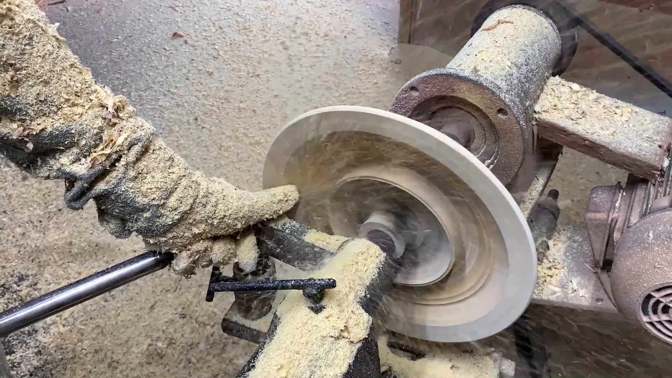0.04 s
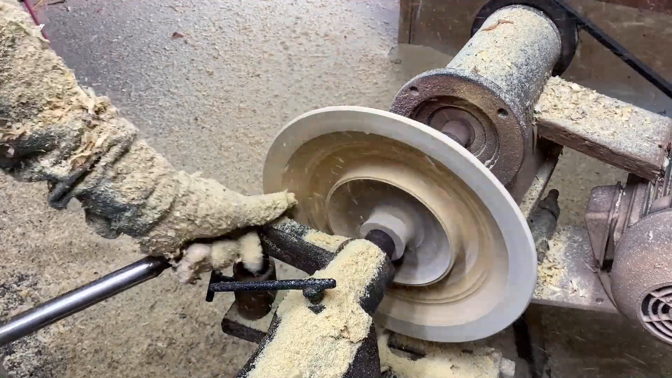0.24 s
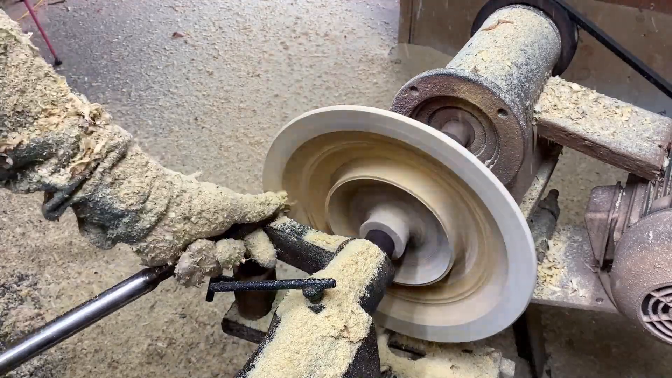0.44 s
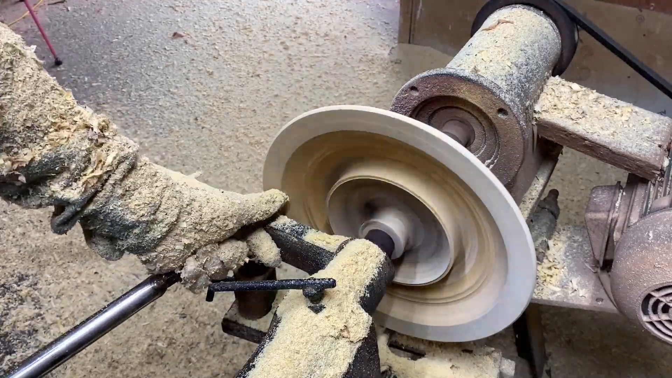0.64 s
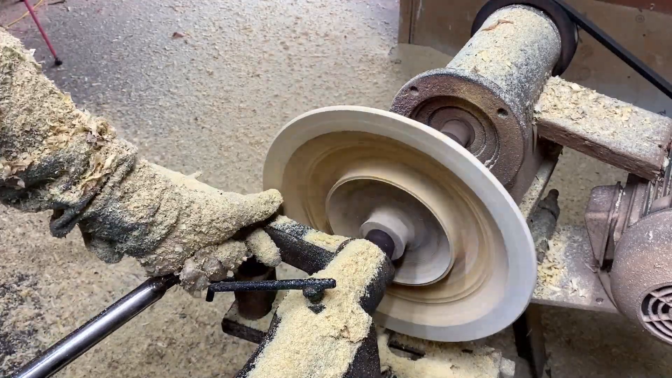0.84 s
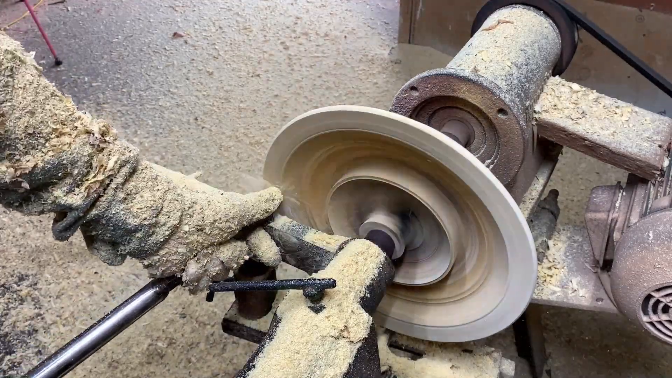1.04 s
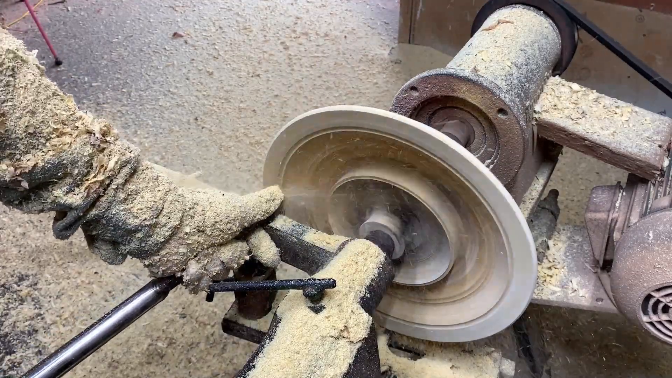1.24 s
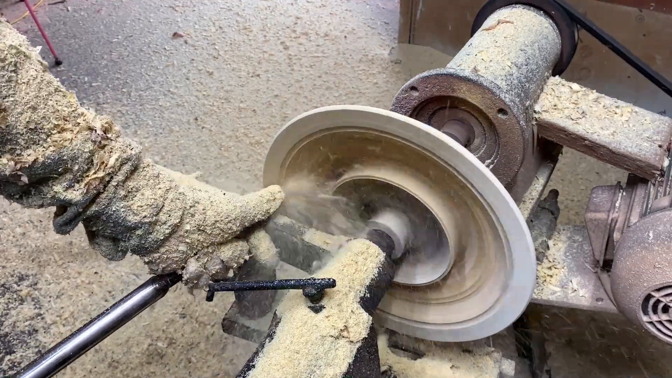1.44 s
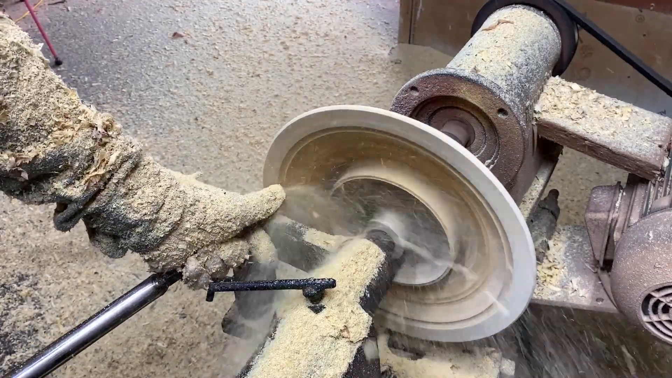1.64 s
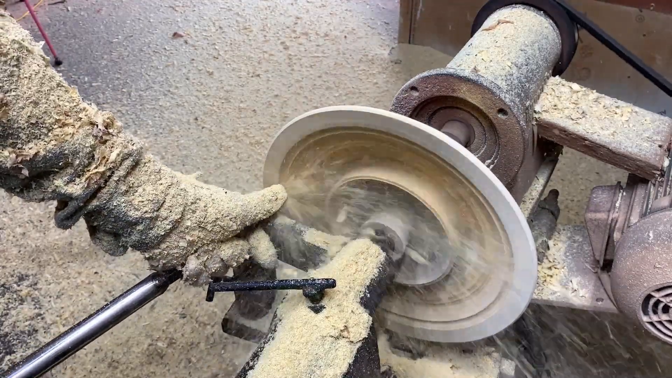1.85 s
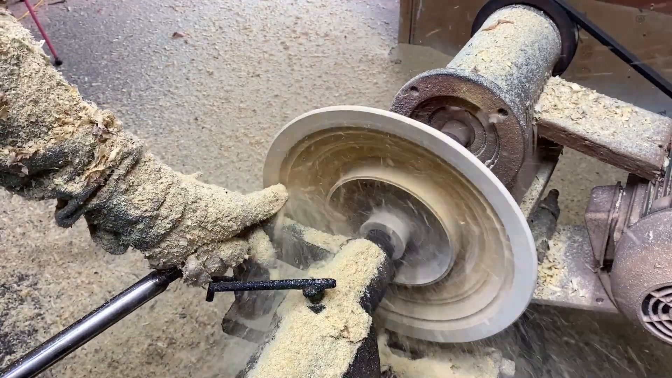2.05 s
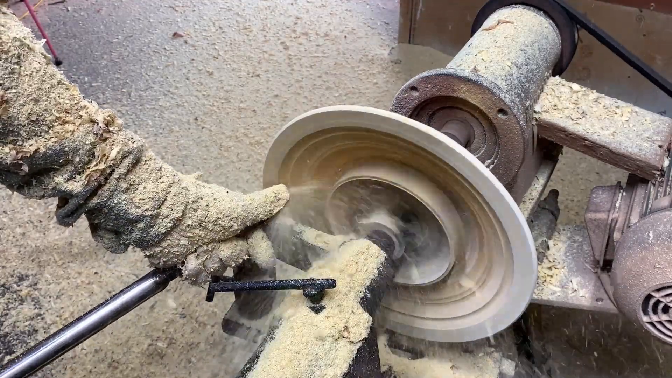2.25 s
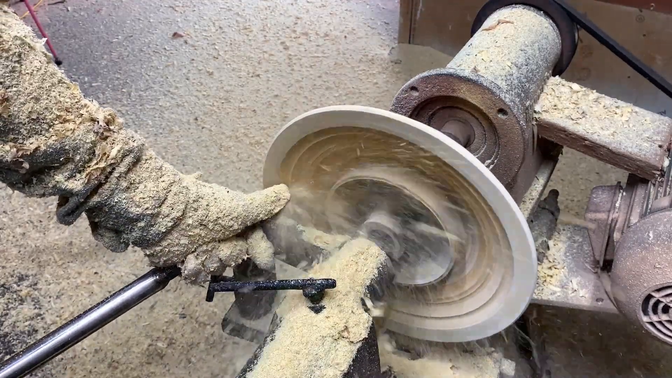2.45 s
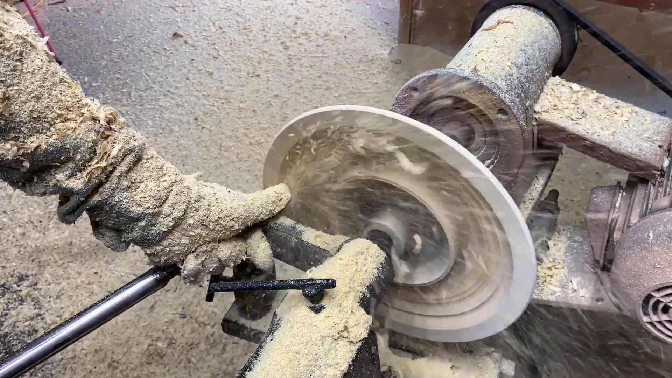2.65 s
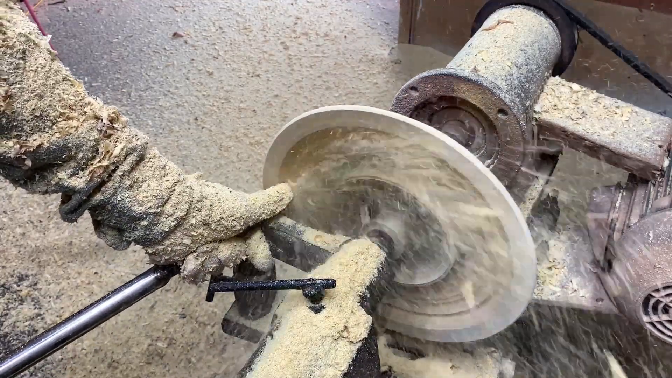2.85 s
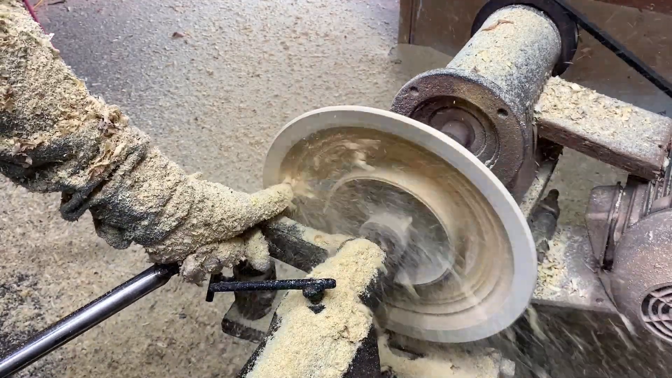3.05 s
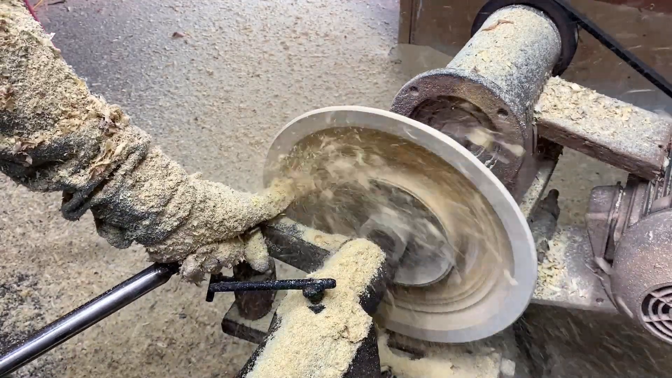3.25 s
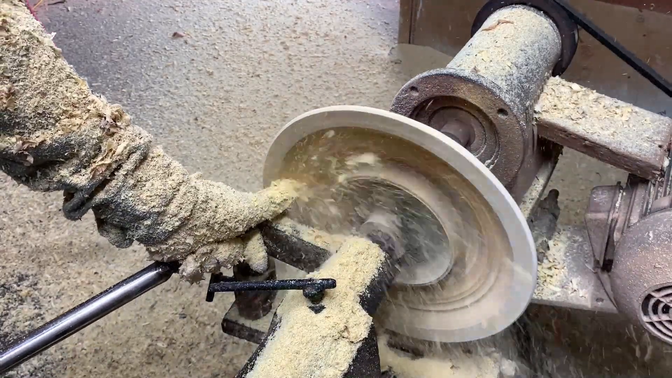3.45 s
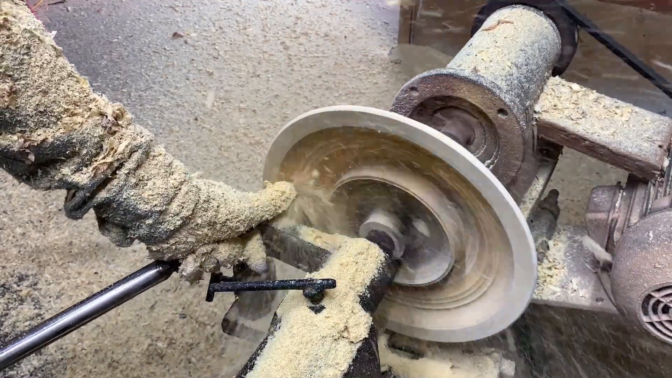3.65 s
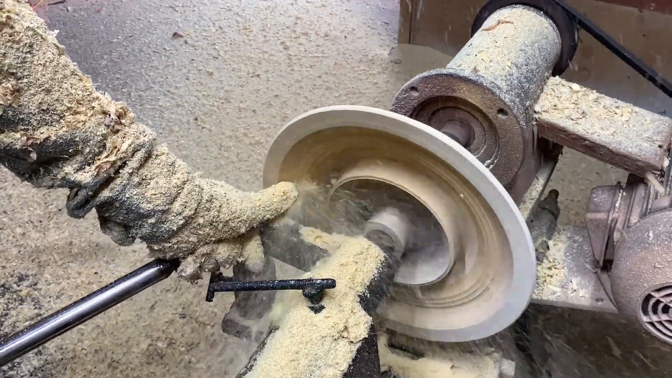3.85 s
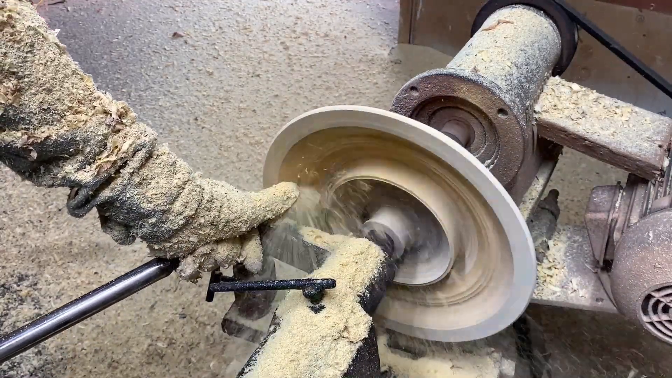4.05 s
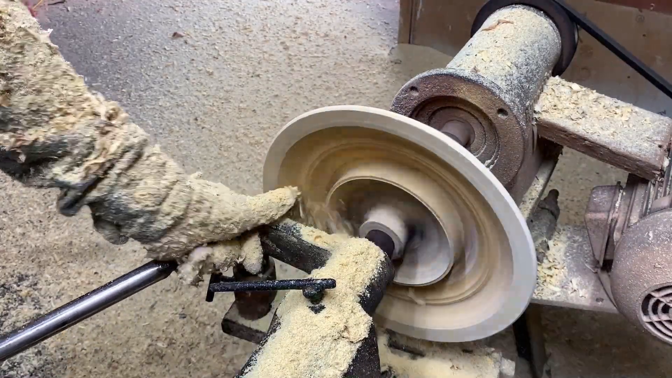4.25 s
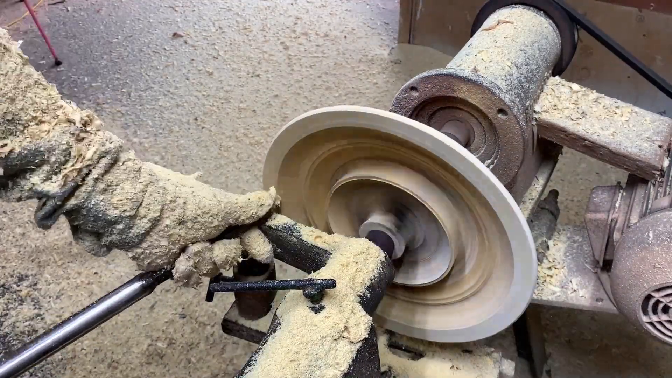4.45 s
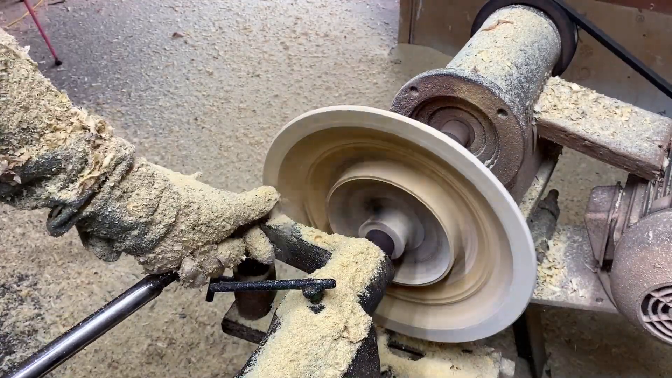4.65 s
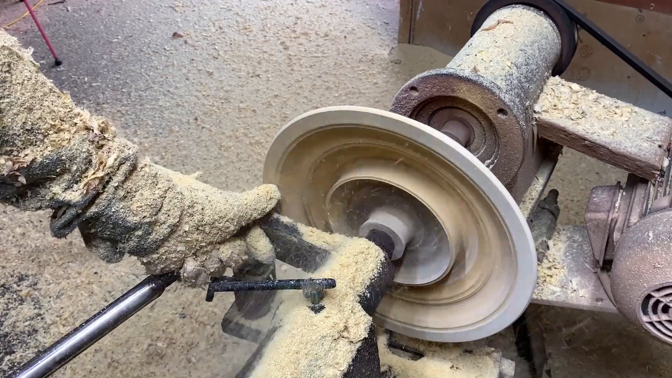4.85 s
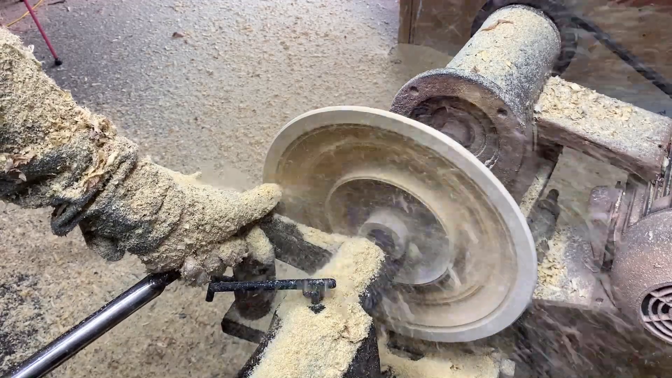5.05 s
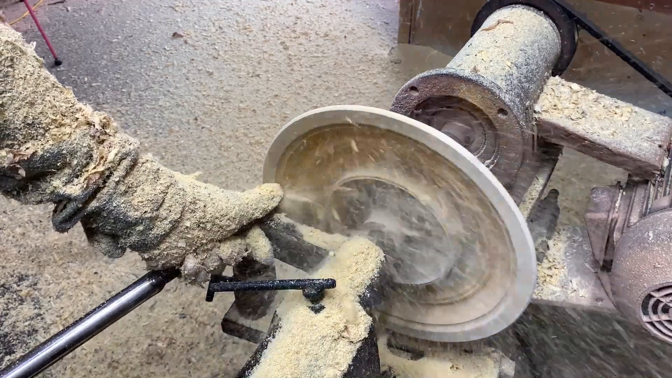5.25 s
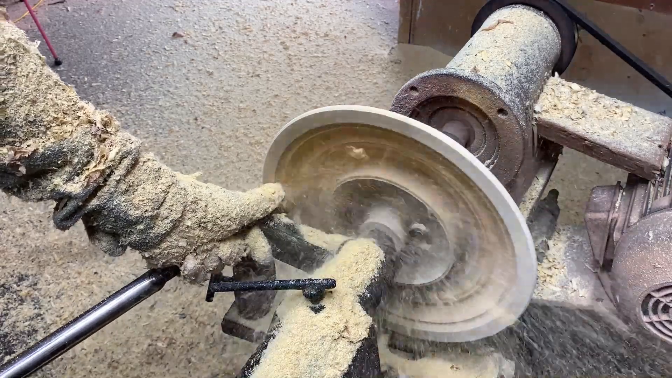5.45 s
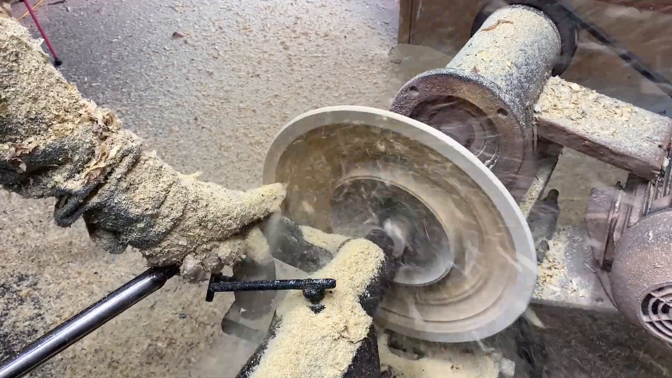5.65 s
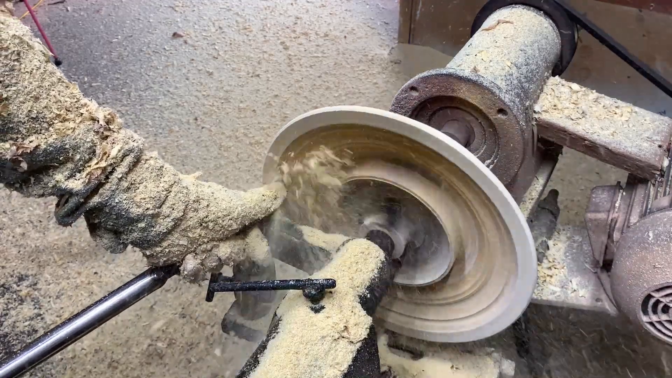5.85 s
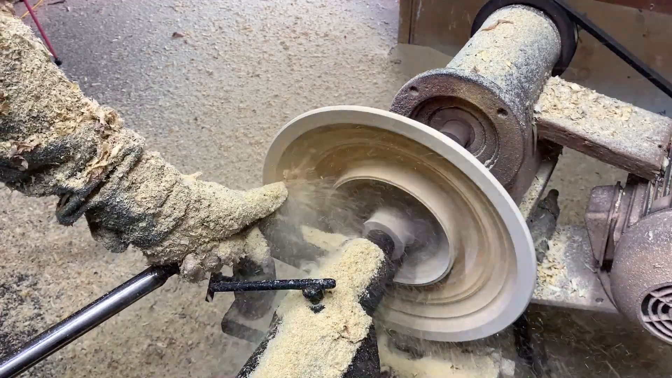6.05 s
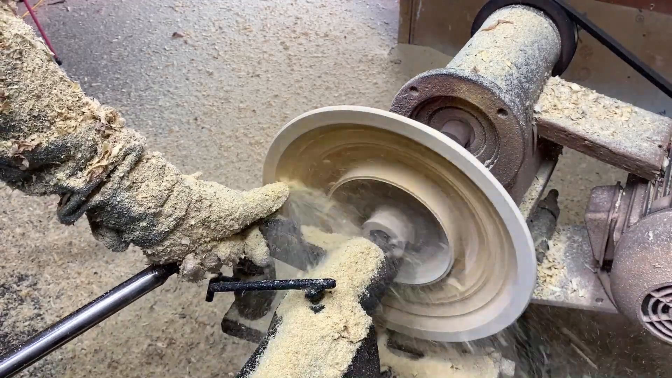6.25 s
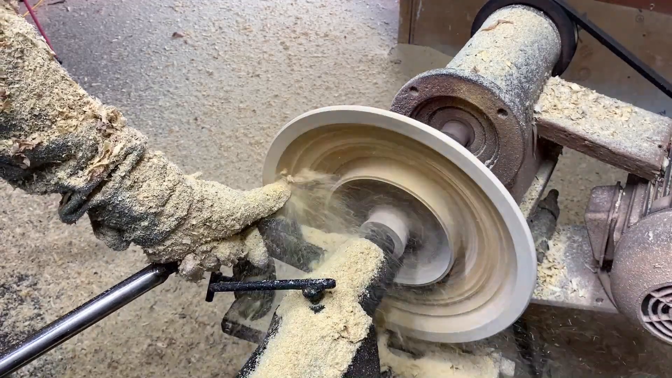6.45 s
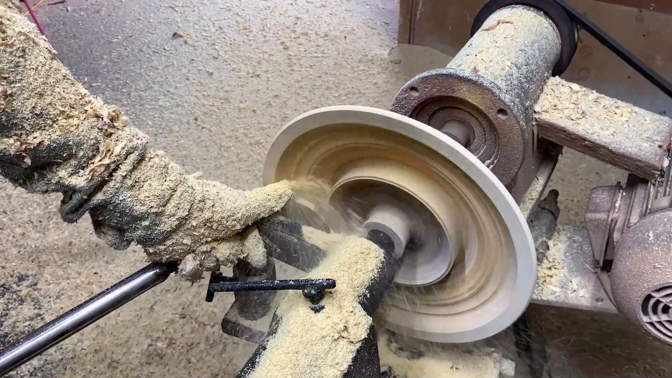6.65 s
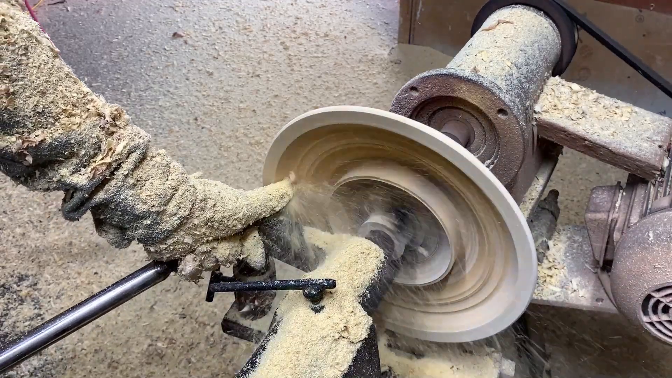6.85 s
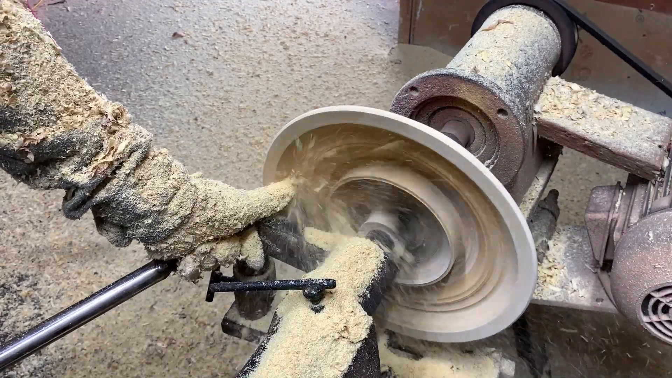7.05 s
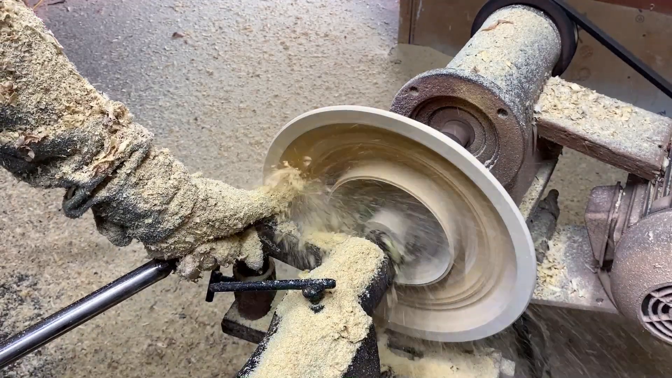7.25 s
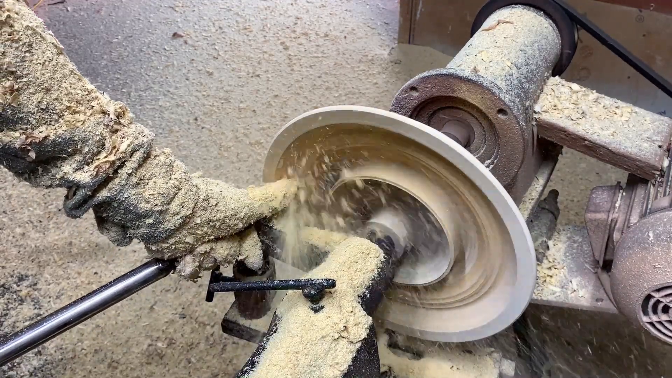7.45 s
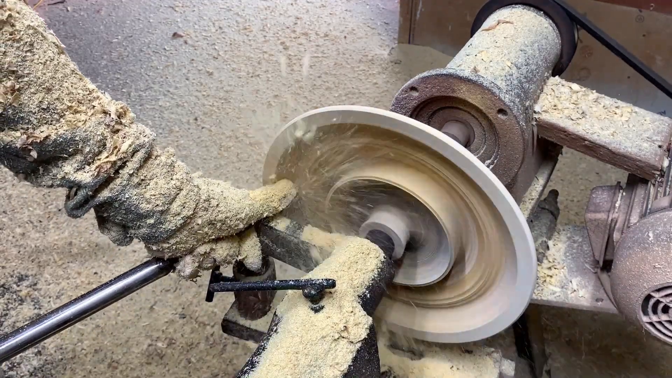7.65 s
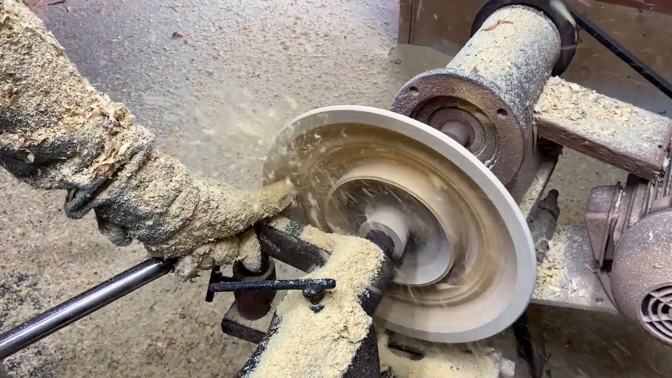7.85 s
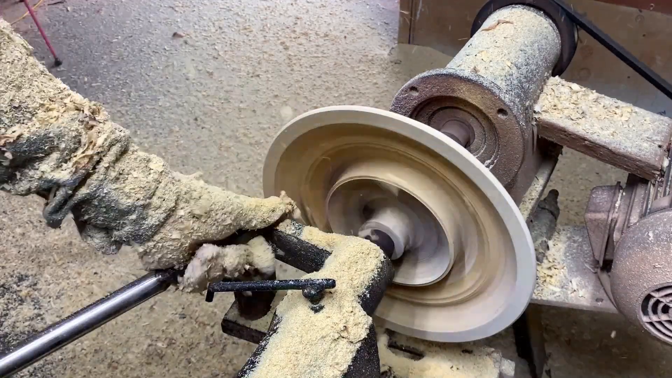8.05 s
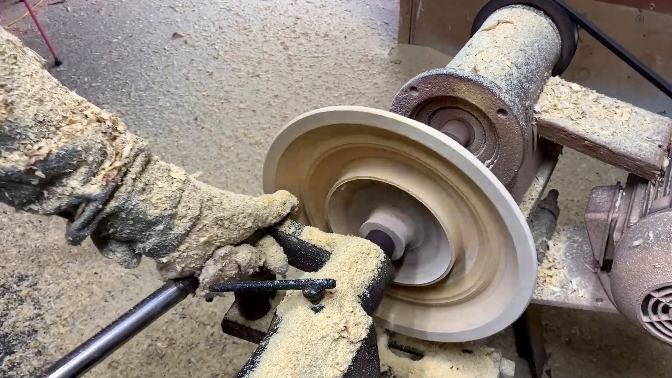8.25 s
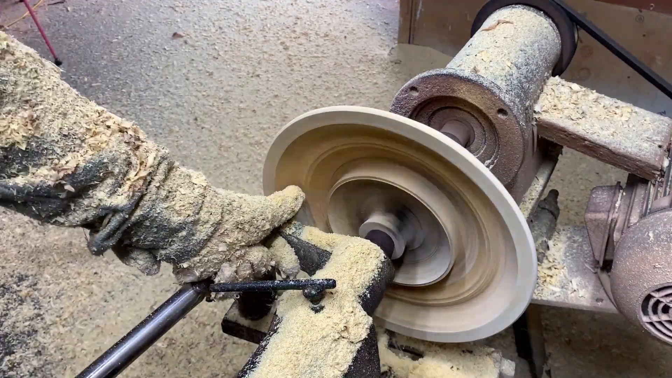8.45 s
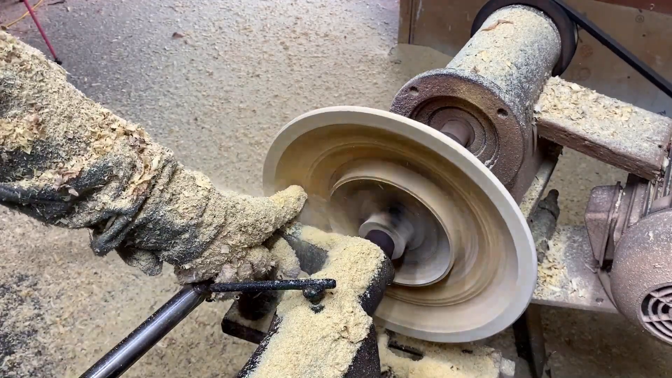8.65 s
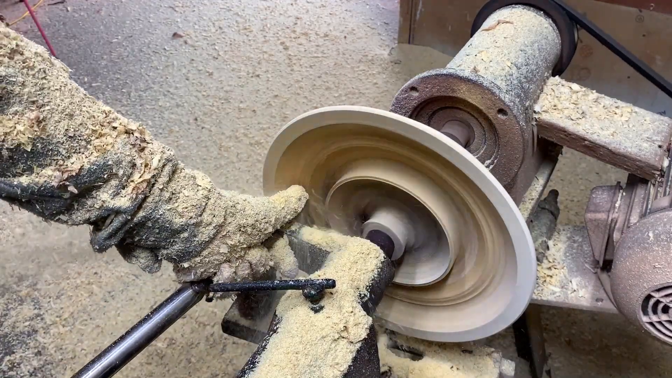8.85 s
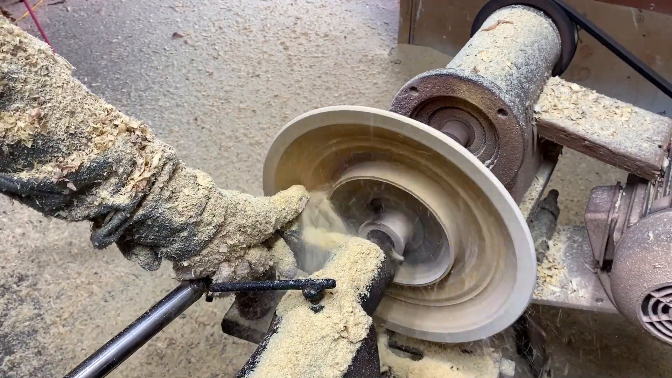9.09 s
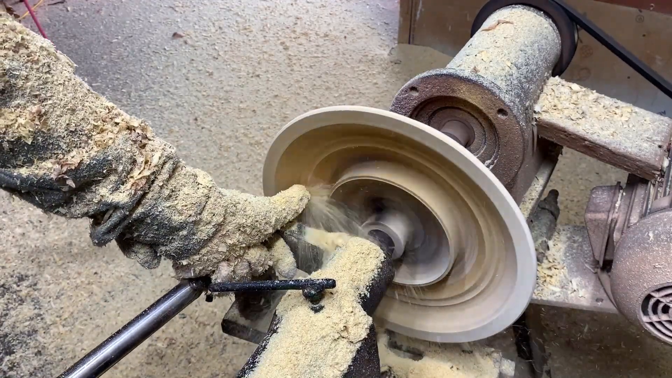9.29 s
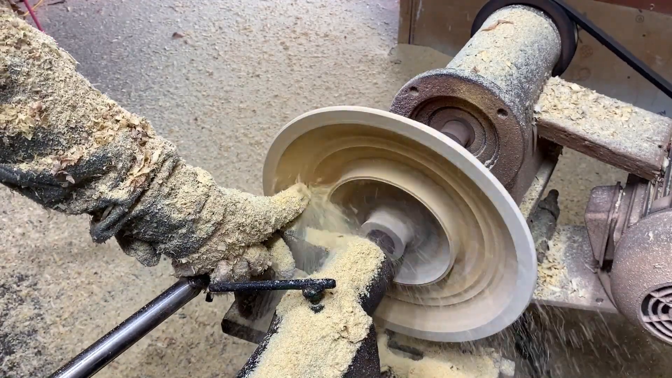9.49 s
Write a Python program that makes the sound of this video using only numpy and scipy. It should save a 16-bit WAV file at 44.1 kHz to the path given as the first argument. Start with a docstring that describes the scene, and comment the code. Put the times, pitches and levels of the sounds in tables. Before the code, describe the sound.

A wood lathe is already running close by, its motor droning with a throb over a belt whirr and a faint high whine. A gouge ends a cut on the spinning wooden plate at about 0.2 seconds and skims it lightly at 0.8. From 1 to 4.3 seconds it bites in a long, rough rasp, with hissing chips, slight ringing from plate and tool, and sharp little cracks, mostly around 2 to 2.4 seconds. After a brief lift, a second stroke runs from 4.6 to 7.9 seconds, crackling most between 5 and 6. Under each cut the motor sags and growls louder, then recovers in the gaps. At 8.4 seconds the edge returns, squeaks briefly and keeps cutting to the end, at about 9.5 seconds. Throughout, air stirred by the plate buffets the microphones in irregular low gusts, and the chip hiss is brighter on the right.

```python
"""A wood lathe is already running, its motor droning in throbbing bands, as a gouge ends a cut on a plate.
The edge lifts, skims the wood once, then bites for two long strokes, from about 1 s and 4.6 s.
Each stroke rasps, rings in plate and tool and sprays chips; the motor sags and growls, then recovers.
At 8.4 s the edge returns, squeaks and cuts on to the end. All along, air stirred by the spinning
plate buffets two unlike microphones, the right one brighter."""
import sys
import numpy as np
from scipy import signal
from scipy.fft import rfft, irfft, next_fast_len
from scipy.io import wavfile
from scipy.ndimage import uniform_filter1d

SR = 44100
rng = np.random.default_rng(int(sys.argv[2]) if len(sys.argv) > 2 else 0)


def generate_wav(sig):
    """Save sig (samples, or channels by samples) to the path in sys.argv[1] as 16-bit PCM at SR."""
    pcm = np.round(np.clip(np.atleast_2d(sig).T, -1, 1) * 32767).astype(np.int16)
    wavfile.write(sys.argv[1], SR, pcm)


N = 419832

# gouge strokes: start/s, end/s, attack/s, release/s, then start and end pairs of: place on the plate/0-1,
# and at full bite rasp/dB, edge/dB, spray/dB, dust against spray/dB
STROKES = [(-.4, 0.22, .05, 0.23, 0.76, 0.85, -28, -30, -37, -40.5, -45, -43, -4, -5.5),
           (.735, 0.84, 0.35, .06, .92, 0.96, -35, -35, -37, -39, -48, -47, -5, -14),
           (1.021, 4.28, 0.038, 0.29, 0.01, .95, -29.5, -30.5, -31, -42, -49, -51.5, -1.5, 1.5),
           (4.645, 7.915, 0.056, 0.21, 0.02, 0.96, -29, -31.5, -31.5, -44, -42.5, -52.5, -5, 0.5),
           (8.402, 9.69, 0.21, .1, 0.6, .98, -30, -29, -38.5, -41, -44, -52, -0.5, -1)]
# accents where the gouge digs in or skips: t/s, half-width/s, cut/dB, low drone/dB, upper drone/dB
DIGS = [(0.097, 0.042, 0, 2.5, 5), (1.193, 0.078, 0.5, 4.5, 3.5), (1.376, 0.037, 6, 8.5, 1),
        (2.022, 0.019, 3.5, 5.5, -1), (3.552, 0.021, 3, 5.5, 3), (4.84, 0.094, 4, 6.5, 2),
        (1.6, 0.15, 2, 0.5, -1.5), (2.705, 0.17, 1.5, 1, 1.5), (5.207, .02, 0, 7, 0),
        (5.23, 0.11, 1.5, 0, -1.5), (5.34, .015, 0, 5, 0), (5.721, .04, 6, 7, -4.5),
        (5.988, 0.044, 1.5, 4, 3), (6.37, .05, 1, 4, 2.5), (7.86, 0.028, 5, -4, 1),
        (8.434, 0.012, -10, 1, 5), (8.667, .012, 5, 0.5, 0.5), (8.856, 0.13, 3, 9, 1), (9.2, .2, 0.5, 2, 2),
        (9.298, .012, 5, 0, 2), (9.425, 0.055, 6, 6, 4)]
# the hardest spots catching the edge: t/s, level/dB
CATCHES = [(.792, -43), (1.0889, -31), (1.1516, -20.5), (1.4671, -27), (2.0114, -32), (2.1405, -20.5),
           (2.265, -17.5), (2.3307, -23), (2.391, -29), (3.0973, -32), (3.2205, -30), (4.714, -26),
           (5.0474, -23), (5.175, -20.5), (5.3486, -19.5), (5.4025, -21), (5.516, -18), (5.6391, -24),
           (5.7059, -25), (5.769, -23), (5.9604, -29), (8.4123, -36), (8.9615, -27)]
# plate rings: f/Hz at place 0, glide/Hz across the plate, width/Hz, top level/dB against the rasp,
# loudest place/0-1, travel from there to lose 10 dB/share of the plate
PLATE_MODES = [(1806, -20, 65, -8, 0.4, 2), (2318, -39.5, 110, -9.5, 0.2, 2),
               (3620, -600, 140, -8.5, 0.8, 0.45), (3480, -60, 42, -11.5, 0.44, 0.35)]
# gouge rings: the same columns, level/dB against the edge hiss
TOOL_MODES = [(4760, -130, 80, -4.5, .36, 0.42), (4760, -50, 100, -9.5, .85, .4),
              (5260, -150, 85, -7, 0.11, 0.14), (5700, -100, 87, -8, .02, .06),
              (5990, -100, 75, -13, .3, 0.5), (6520, -300, 130, -11, .08, .3),
              (6390, -30, 130, -10, .6, .6), (5500, -2300, 260, -11, 0.4, 0.4),
              (4300, 60, 140, -11, 0.45, .3)]
# EQ curves of the cut: f/Hz, relative level/dB
RASP_EQ = [(250, 6), (400, -11), (850, -1.5), (1100, 6), (1500, -1), (2500, -0.5), (3300, -3.5),
           (4200, -19), (5500, -47)]  # tearing fibres
EDGE_EQ = [(2800, -31), (3800, 1.5), (4800, 1), (6000, -4.5), (7000, -6), (8000, -16.5), (9500, -22)]  # hiss at the steel edge
SPRAY_EQ = [(5500, -27), (7200, 1), (8200, 6.5), (9200, -3.5), (10500, -13), (12000, -26)]  # flying chips
DUST_EQ = [(9000, -6), (10800, -2.5), (12000, -5), (14000, -5), (14900, -11), (15300, -20), (16000, -32)]  # fine dust
CRACK_EQ = [(1000, -8), (1800, 3), (2500, 1.5), (4700, -0.5), (6400, -5), (7400, -12), (8600, -6.5),
            (11000, -20), (15500, -28)]  # hard spots
# motor speed: t/s, turn rate/Hz
MOTOR_SPEED = [(0.0, 26.33), (0.2, 26.44), (0.45, 26.9), (0.9, 27.03), (1.1, 26.55), (1.35, 25.74),
               (2.0, 25.44), (2.7, 25.63), (3.5, 25.5), (4.15, 25.94), (4.4, 26.89), (4.62, 26.83),
               (4.85, 25.87), (5.5, 25.33), (6.2, 25.37), (7.0, 25.42), (7.8, 25.8), (8.05, 26.81),
               (8.4, 26.9), (8.75, 25.88), (9.1, 25.3), (9.52, 25.21)]
# drone bands: multiple of motor speed, width/Hz, free trim/dB, loaded trim/dB, throb depth/0-1,
# pan/dB left over right
LOW_BANDS = [(22.82, 23.4, -3.5, -9.5, 0.44, -11.5), (21.49, 20.6, -10, -3.5, 0.23, -9),
             (23.87, 76, -8, -5.5, 0.08, -6), (20.24, 68, -10.5, -10, 0, -2.5)]
UPPER_BANDS = [(47.47, 40, -0.5, 0.5, 0.56, -3.5), (44.2, 47, -9, -17, 0.31, -5.5),
               (68, 49, -18, -22, 0.97, -4.5)]
# inverter and motor whine: f/Hz, level/dB before WHINE_GAIN_DB
WHINE_LINES = [(5281, -75), (5529, -75.5), (6062, -72.5), (6783, -73.5), (11418, -94), (12016, -79.5),
               (12608, -78.5)]
# belt and fan whirr: f/Hz, relative level/dB
WHIRR_EQ = [(150, 9), (300, -7), (450, -7), (800, -3.5), (1500, -6), (2500, -10), (4500, -23.5),
            (6000, -20), (8000, -34.5), (10500, -52)]
# gusts on the microphones: t/s, peak level/dB, time to fall 20 dB/s
GUSTS = [(.12, -27, .12), (.727, -33, .08), (.83, -29, .12), (.88, -30, .06), (.957, -24, .1),
         (1.121, -21, .05), (1.178, -17.5, .1), (1.327, -28, .08), (1.72, -32, .1), (1.835, -24.5, .09),
         (1.948, -28, .08), (2.071, -25, .05), (2.182, -28, .08), (2.27, -24, .06), (2.351, -18.5, .14),
         (2.431, -21, .06), (2.509, -26, .05), (2.8, -26, .1), (3.083, -31, .1), (3.183, -31, .08),
         (3.27, -26, .15), (3.346, -16, .14), (3.94, -33, .1), (4.305, -19.5, .12), (4.382, -20, .07),
         (4.851, -17.5, .1), (4.939, -20, .08), (5.05, -22, .14), (5.13, -27, .08), (5.398, -20, .1),
         (5.565, -20, .1), (5.63, -25, .05), (5.685, -25, .06), (5.906, -26, .1), (6.105, -28, .12),
         (6.21, -31, .05), (6.325, -21, .1), (6.883, -33, .1), (7.158, -27, .08), (7.565, -19.5, .1),
         (7.685, -26, .06), (8.195, -20, .08), (8.23, -20, .06), (8.296, -18, .12), (8.385, -19, .07),
         (8.461, -30, .06), (8.6, -31, .1), (8.73, -19, .1), (8.874, -27, .05), (8.918, -27, .07),
         (9.01, -24, .12), (9.31, -30, .08), (9.5, -30, .3)]
# body and top of the gusts: f/Hz, relative level/dB
RUMBLE_EQ = [(15, 3.0), (30, -11.5), (70, 1), (120, -0.5), (200, -5.0), (350, -14.5), (600, -23.5)]
FLUTTER_EQ = [(100, -20), (200, 0.5), (350, -9), (600, -16), (900, -35)]
# cavity of the right microphone port: f/Hz, level/dB against the left
RIGHT_PORT_EQ = [(6000, 0), (7880, 2), (8060, 15), (9130, 14.5), (9400, 10), (10000, 7), (10600, 1.5),
                 (13000, 0)]

SPINDLE_HZ, SPINDLE_START_TURN = 15.7, 0.14
FIRST_BITE, SHORTEST_BITE_S = 0.4, .2  # share of the bite taken at once; a shorter stroke only skims
SLOW_ENDS = .6  # 0 = even travel, 1 = slow at both ends of a stroke
TOUCH_DB, EASED_DB = (-13, -13, -9.5), (-11, -8.5, -9)  # rasp, edge, spray against full bite
RING_WANDER, RING_BURST_DB, RING_FADE_DB, RING_TURN_DB = .005, 2.5, 1.2, 1.25
TICK_TURN, TICK_DB, TICK_SPREAD_DB = .7, -38, 3.5
FREE_HZ, LOADED_HZ, MOTOR_START_TURN = 26.9, 25.5, .44
DRONE_FREE_DB, DRONE_BITING_DB, DRONE_TRAVEL_DB = (-31.5, -36.5), (-26.5, -26), (-2, -2)  # low, upper
DRONE_LAG_S, EASED_EFFORT_LOSS = 0.037, 0.48
PLATE_THROB_DB, PLATE_THROB_TURN = 2.4, .06
WHINE_GAIN_DB, CARRIER_HZ, CARRIER_DB = 7.5, 12016, -75
WHIRR_DB, BREEZE_DB = -40.5, -41.5
GUST_RISE_SHARE = 0.67  # attack as a share of the fall time
CUTOFF_HZ = 15760


def cut():
    """Fibres tear as dense noise; pressure wavers, and the grain passes with each turn of the plate."""
    rasp_db, edge_db, spray_db, dust_db = cut_levels()
    angle = plate_angle()
    grain_db = 0.72 * np.cos(angle)
    pressure_db = 0.55 * drift(6.6) + 0.32 * np.cos(4 * angle + 1.5) + 0.37 * np.cos(3 * angle + 0.66)
    tearing, clumps = drift(156), drift(31)  # chips break off in bursts
    noise = rng.standard_normal((4, 2, N))
    ring_drive = from_db(0.43 * tearing + 0.73 * clumps)
    rasp = colour(noise[0] * from_db(1.7 * tearing + 2.0 * clumps), RASP_EQ)
    rasp += ring_drive * rings(PLATE_MODES, angle)
    edge = colour(noise[1] * from_db(1.26 * tearing + 0.21 * clumps + 0.41 * drift(9.8)), EDGE_EQ)
    edge += ring_drive * rings(TOOL_MODES, angle)
    spray = colour(noise[2] * from_db(0.87 * tearing + 0.41 * drift(30)), SPRAY_EQ)
    dust = colour(noise[3] * from_db(0.46 * tearing + 0.9 * drift(28) + .8 * drift(4)), DUST_EQ)
    mix = from_db(rasp_db + grain_db) * rasp + from_db(edge_db + .4 * grain_db) * edge
    mix += from_db(spray_db) * (spray + from_db(dust_db) * dust)
    return contact() * from_db(pressure_db) * fibre_texture(mix, depth_db=1.5)


def strokes():
    """The hand's moves: bite, easing off and place on the plate (all 0-1), and four full-bite levels."""
    t = np.arange(N) / SR
    table = np.array(STROKES)
    handovers = (table[1:, 0] + table[:-1, 1]) / 2
    start, end, attack_s, release_s, *pairs = table[np.searchsorted(handovers, t)].T
    since = t - start - 1 / SPINDLE_HZ  # the edge skims for one turn first
    biting = (since > 0) * (end - start > SHORTEST_BITE_S)
    bite = biting * (1 - (1 - FIRST_BITE) * np.exp(-np.maximum(since, 0) / attack_s))
    easing = np.clip(1 - (end - t) / release_s, 0, 1) ** 2
    done = np.clip((t - start) / (end - start), 0, 1)
    done -= SLOW_ENDS * np.sin(2 * np.pi * done) / (2 * np.pi)
    place, *levels_db = (first + (last - first) * done for first, last in zip(pairs[::2], pairs[1::2]))
    return bite, easing, np.clip(place, 0, 1), np.array(levels_db)


def contact(fade_s=0.02):
    """Gate: 1 while the gouge is on the wood, 0 when lifted."""
    t = np.arange(N) / SR
    return sum(np.clip(np.minimum(t - start, end - t) / fade_s + .5, 0, 1) for start, end, *_ in STROKES)


def digs():
    """Digs and skips briefly push or duck the cut, the low drone and the upper drone, in dB."""
    return control_rate(lambda t: sum(
        np.outer(push_db, np.exp(-((t - at) / width_s) ** 2)) for at, width_s, *push_db in DIGS))


def cut_levels():
    """Rasp, edge and spray in dB swell with the bite and sink on easing off; dust rides on the spray."""
    bite, easing, _, full_db = strokes()
    levels_db = full_db[:-1] + np.outer(TOUCH_DB, 1 - bite) + np.outer(EASED_DB, easing) + digs()[0]
    return *levels_db, full_db[-1]


def plate_angle():
    """Angle of the spinning plate in radians."""
    return 2 * np.pi * (SPINDLE_HZ * np.arange(N) / SR + SPINDLE_START_TURN)


def rings(modes, angle):
    """Gliding resonances, each speaking up as the gouge passes its sweet spot on the plate."""
    place = strokes()[2]
    out = 0
    for start_hz, glide_hz, width_hz, top_db, sweet_spot, reach in modes:
        hz = (start_hz + glide_hz * place) * (1 + RING_WANDER * drift(2.5)[0])
        level_db = top_db - 10 * ((place - sweet_spot) / reach) ** 2
        motion_db = RING_BURST_DB * drift(12.7) + RING_FADE_DB * drift(1.1) + RING_TURN_DB * np.cos(angle)
        out += from_db(level_db + motion_db) * narrow_noise(np.cumsum(hz) / SR, width_hz)
    return out


def fibre_texture(x, depth_db):
    """Half-octave slices, 1 to 8 kHz, swell and sink on their own as fibres of different sizes tear."""
    size = next_fast_len(N)
    spectrum = rfft(x, size)
    khz = np.arange(1, size // 2 + 2) * SR / size / 1000
    half_octaves = np.clip(2 * np.log2(khz), 0, 6)
    slices = (irfft(spectrum * np.clip(1 - abs(half_octaves - k), 0, 1), size)[:, :N] for k in range(7))
    return sum(part * from_db(depth_db * drift(29.0)) for part in slices)


def catches(t60_s):
    """Hard spots crack against the edge, over a fainter tick once a turn while the gouge bites."""
    crack = colour(rng.standard_normal((2, N)), CRACK_EQ)
    turns = np.arange(1, int(SPINDLE_HZ * N / SR)) + TICK_TURN - SPINDLE_START_TURN
    ticks = (turns / SPINDLE_HZ * SR).astype(int)
    tick_db = TICK_DB + TICK_SPREAD_DB * rng.standard_normal(N)[:len(ticks)]
    bite = strokes()[0] * contact()
    hits = np.zeros(N)
    hits[ticks] = from_db(tick_db) * bite[ticks]
    for at, level_db in CATCHES:
        hits[round(at * SR)] = from_db(level_db)
    decay = from_db(-60 / (t60_s * SR))
    return signal.lfilter([1], [1, -decay], hits + 1e-18) * crack


def squeak(at_s, half_width_s, hz, level_db):
    """The edge meets the wood again with a narrow ring that swells and dies."""
    t = np.arange(N) / SR
    swell = np.exp(-((t - at_s) / half_width_s) ** 2)
    return from_db(level_db) * swell * narrow_noise(hz * t, width_hz=25)


def motor():
    """Drone and whine; under load the motor slows and its low end swells once a turn of the plate."""
    speed = np.interp(np.arange(N) / SR, *np.transpose(MOTOR_SPEED))
    turns = MOTOR_START_TURN + np.cumsum(speed) / SR
    load = np.clip((FREE_HZ - speed) / (FREE_HZ - LOADED_HZ), 0, 1)
    low_db, upper_db = drone_levels()
    low_db += PLATE_THROB_DB * load * np.cos(plate_angle() + 2 * np.pi * PLATE_THROB_TURN)
    low = drone(LOW_BANDS, turns, load, low_db, steadiness=.2)
    upper = drone(UPPER_BANDS, turns, load, upper_db, steadiness=.3)
    return low + upper + whine(load)


def drone(bands, turns, load, level_db, steadiness):
    """Noise bands track multiples of motor speed and throb once a motor turn."""
    throb = np.cos(2 * np.pi * turns) + 0.21 * np.cos(4 * np.pi * turns + 0.48)
    out = 0
    for multiple, width_hz, free_db, loaded_db, depth, pan_db in bands:
        gain = from_db(free_db + (loaded_db - free_db) * load) * panned(pan_db)
        band = rms_one(narrow_noise(multiple * turns, width_hz))
        out += gain * (1 + depth * throb) * compress(band, window_s=.02, amount=steadiness)
    return from_db(level_db) * out


def drone_levels():
    """Low and upper drone in dB: they follow the bite a little late, sink along the plate, surge on digs."""
    bite, easing, place, _ = strokes()
    effort = bite * (1 - EASED_EFFORT_LOSS * easing) * contact()
    lag = np.exp(-1 / (DRONE_LAG_S * SR))
    effort = signal.lfilter([1 - lag], [1, -lag], effort, zi=[lag * effort[0]])[0]
    level_db = np.outer(DRONE_FREE_DB, 1 - effort) + np.outer(DRONE_BITING_DB, effort)
    return level_db + np.outer(DRONE_TRAVEL_DB, place * effort) + digs()[1:]


def whine(load):
    """Thin tones from the drive, blurred by uneven running; the inverter's carrier grows with load."""
    t = np.arange(N) / SR
    lines = 0
    for hz, level_db in WHINE_LINES:
        tone = 0.63 * np.sin(2 * np.pi * hz * t) + 0.96 * narrow_noise(hz * t, width_hz=45)
        lines += from_db(level_db + WHINE_GAIN_DB) * tone
    carrier = from_db(CARRIER_DB) * load * narrow_noise(CARRIER_HZ * t, width_hz=4)
    return panned(-1.5) * lines + panned(-14) * carrier


def buffeting():
    """Air off the plate hits the microphones as lumpy rumble; harder gusts are brighter."""
    gust_db = control_rate(gust_level)[0]
    lumps = from_db(gust_db + 2.5 * drift(42))
    shared, own = rng.standard_normal(N), rng.standard_normal((2, N))
    air = .5 * np.array([shared, np.roll(shared, 110)]) + own  # eddies reach the right port later
    rumble = compress(colour(air, RUMBLE_EQ), window_s=.03, amount=.6)
    flutter = from_db(-15.5 + 0.18 * (gust_db + 20.0)) * colour(air, FLUTTER_EQ)
    return lumps * (rumble + flutter)


def gust_level(t):
    """Air level in dB: each gust rises and dies away over a steady breeze."""
    power = from_db(BREEZE_DB) ** 2
    for at, peak_db, fall_s in GUSTS:
        drop_db = 20 * np.maximum(t - at, (at - t) / GUST_RISE_SHARE) / fall_s
        power += from_db(peak_db - drop_db) ** 2
    return 10 * np.log10(power)


def whirr():
    """Belt and fan lay a broad noise bed whose level flickers."""
    flicker_db = 1.3 * drift(25)
    return from_db(WHIRR_DB + flicker_db) * colour(rng.standard_normal((2, N)), WHIRR_EQ)


def from_db(db):
    """Decibels to gain."""
    return 10 ** (np.asarray(db) / 20)


def rms_one(x):
    """Scale to unit rms."""
    return x / np.sqrt(np.mean(x ** 2) + 1e-20)


def panned(pan_db):
    """Left and right gains; positive leans left."""
    return from_db([[pan_db / 2], [-pan_db / 2]])


def drift(rate_hz, channels=1):
    """Random modulator of rms 1: noise at every 20th sample through two one-pole low-passes."""
    pole = np.exp(-2 * np.pi * rate_hz * 20 / SR)
    noise = rng.standard_normal((channels, N // 20 + 2002))
    slow = signal.lfilter([1], [1, -2 * pole, pole * pole], noise)[:, 2000:]
    return np.array([np.interp(np.arange(N) / 20, np.arange(len(row)), row) for row in rms_one(slow)])


def narrow_noise(cycles, width_hz):
    """A narrow noise band riding a phase curve, independent left and right."""
    angle = 2 * np.pi * cycles
    return drift(width_hz, channels=2) * np.cos(angle) + drift(width_hz, channels=2) * np.sin(angle)


def eq_gains(curve, size, outside_db):
    """An EQ curve as FFT bin gains, straight lines on a log axis."""
    hz = np.maximum(np.arange(size // 2 + 1) * SR / size, 1)
    curve_hz, level_db = np.transpose(curve)
    return from_db(np.interp(np.log(hz), np.log(curve_hz), level_db, left=outside_db, right=outside_db))


def colour(x, curve):
    """EQ a sound and scale it to unit rms."""
    size = next_fast_len(N)
    return rms_one(irfft(rfft(x, size) * eq_gains(curve, size, outside_db=-80), size)[:, :N])


def compress(x, window_s, amount):
    """Iron out part of a noise's random swelling; unit rms."""
    power = uniform_filter1d(x ** 2, int(window_s * SR))
    return rms_one(x / (power + .03) ** (amount / 2))


def control_rate(envelope):
    """Work out a slow envelope at every 32nd sample and join the points."""
    t = np.arange(0, N + 32, 32) / SR
    return np.array([np.interp(np.arange(N) / SR, t, row) for row in np.atleast_2d(envelope(t))])


def scene():
    """The running lathe, the gouge on the wood and the stirred air, in stereo."""
    lathe = whirr() + motor()
    gouge = cut() + catches(t60_s=0.03) + squeak(at_s=8.565, half_width_s=.05, hz=3750, level_db=-40)
    return lathe + gouge + buffeting()


def record(dry):
    """A cavity in the right microphone port lifts 8-10 kHz; a steep low-pass trims both sides."""
    size = next_fast_len(N + 4096)
    right = irfft(rfft(dry[1], size) * eq_gains(RIGHT_PORT_EQ, size, outside_db=0), size)[:N]
    low_pass = signal.ellip(14, .5, 70, CUTOFF_HZ, fs=SR, output="sos")
    return signal.sosfilt(low_pass, [dry[0], right])


dry = scene()
out = record(dry)
generate_wav(out)
```